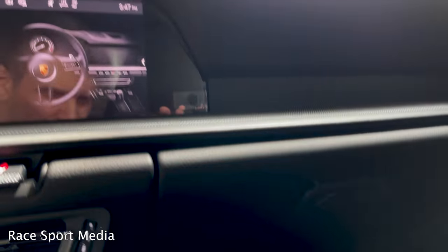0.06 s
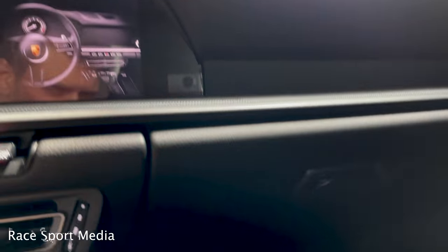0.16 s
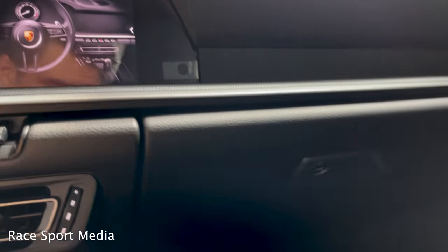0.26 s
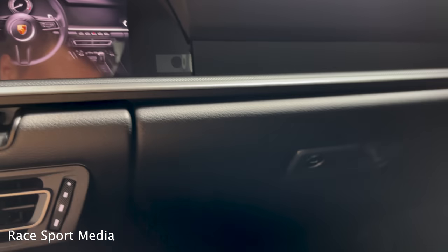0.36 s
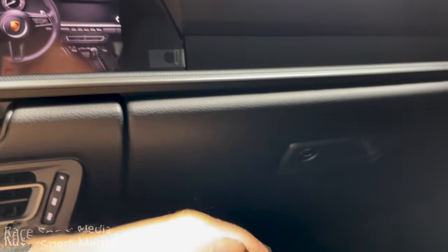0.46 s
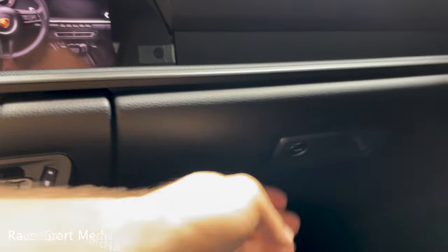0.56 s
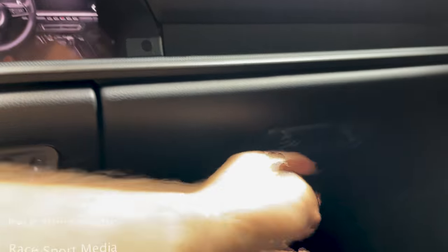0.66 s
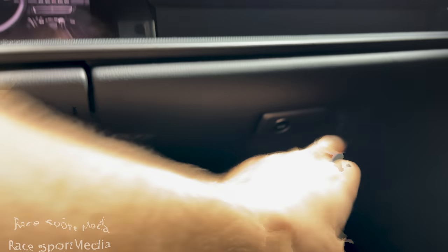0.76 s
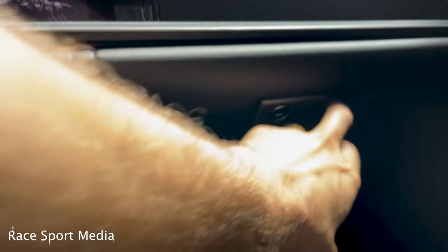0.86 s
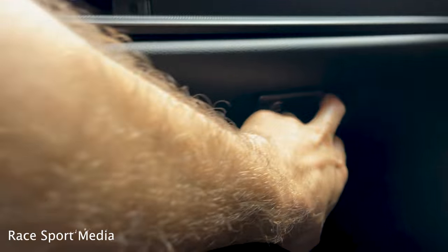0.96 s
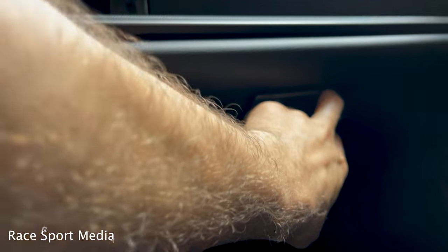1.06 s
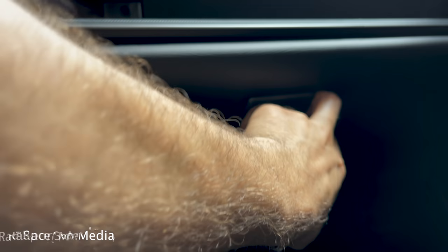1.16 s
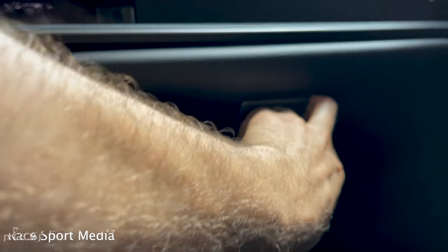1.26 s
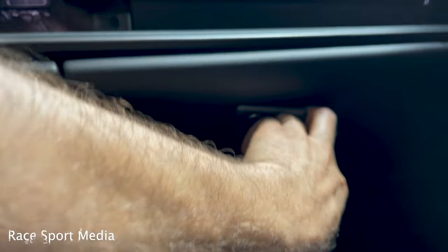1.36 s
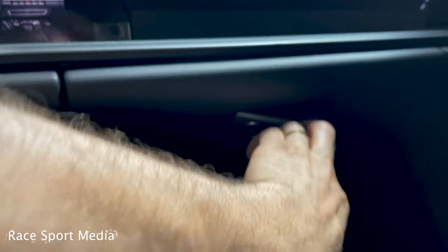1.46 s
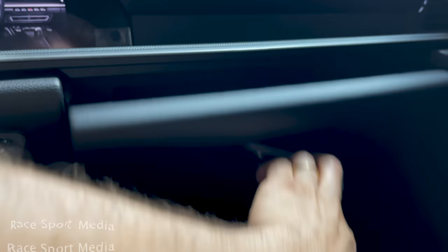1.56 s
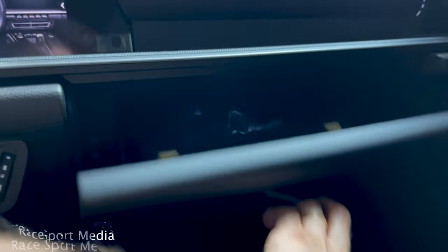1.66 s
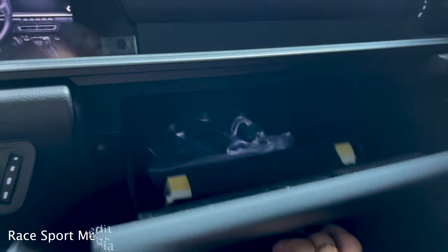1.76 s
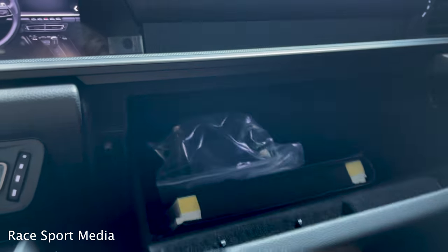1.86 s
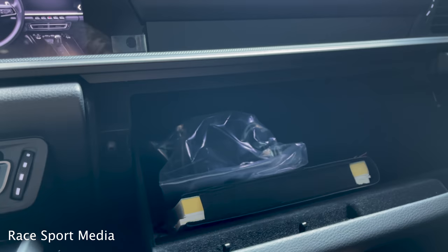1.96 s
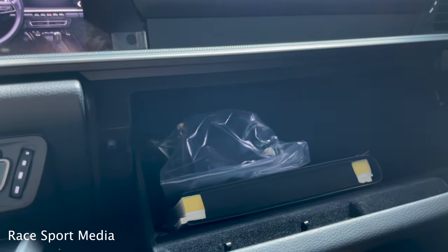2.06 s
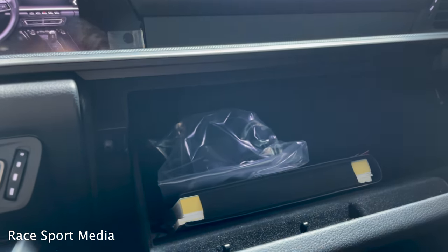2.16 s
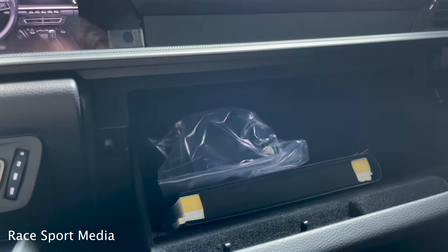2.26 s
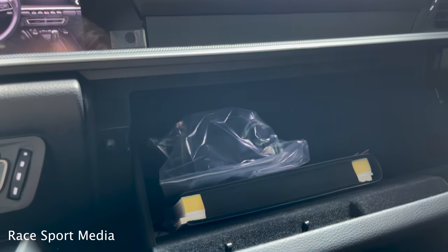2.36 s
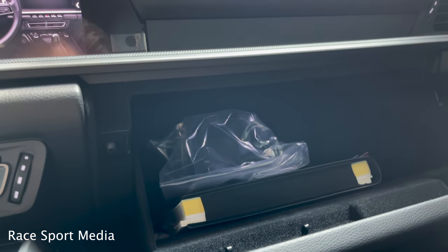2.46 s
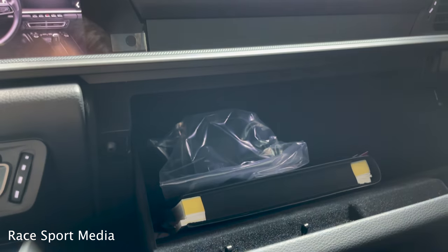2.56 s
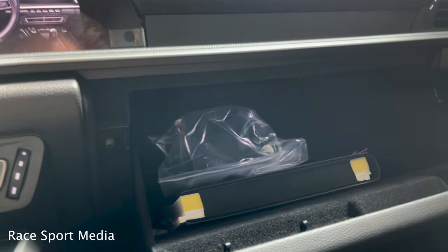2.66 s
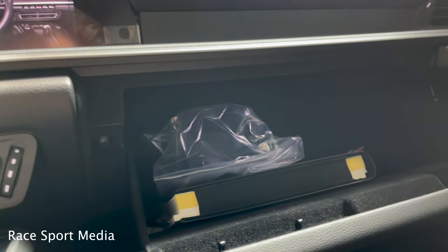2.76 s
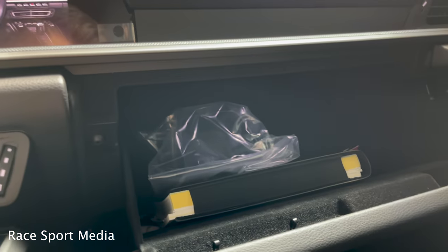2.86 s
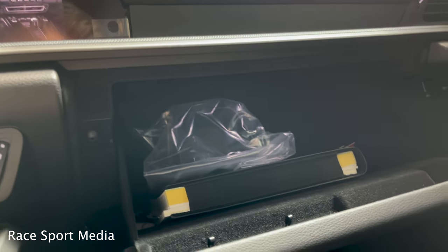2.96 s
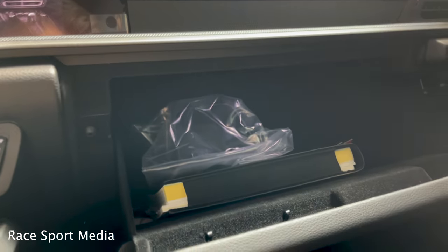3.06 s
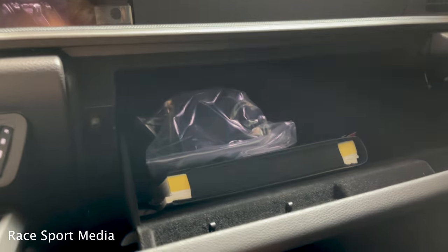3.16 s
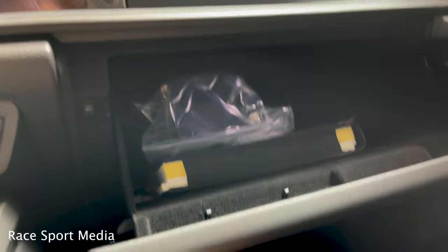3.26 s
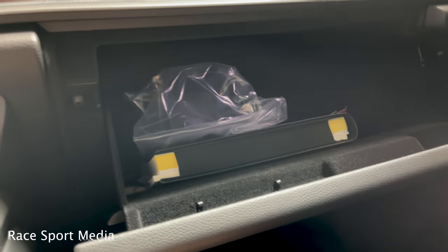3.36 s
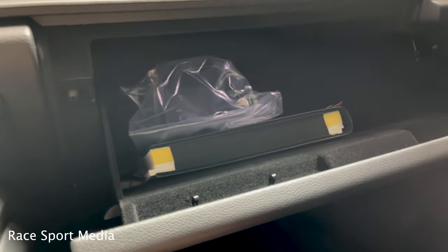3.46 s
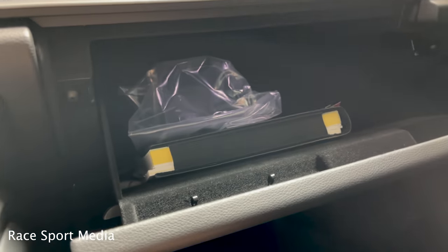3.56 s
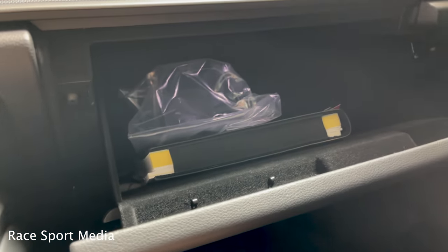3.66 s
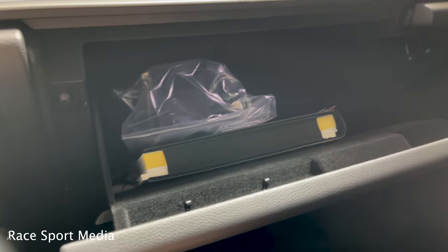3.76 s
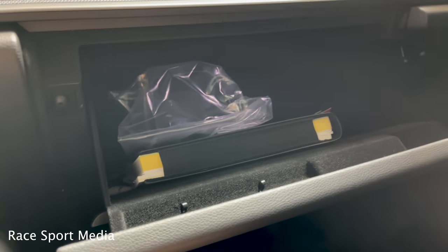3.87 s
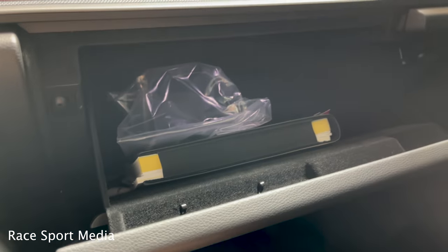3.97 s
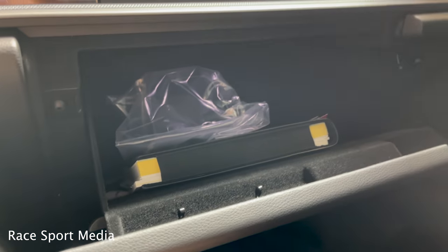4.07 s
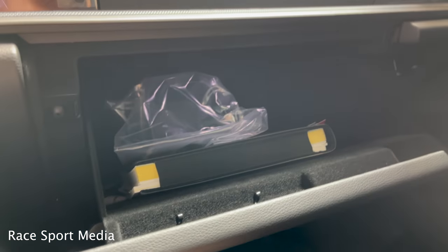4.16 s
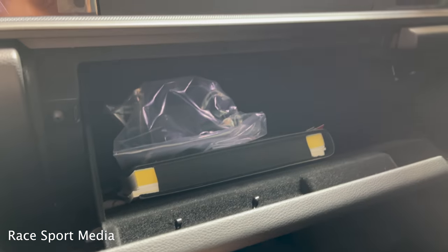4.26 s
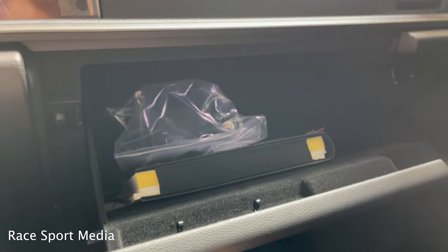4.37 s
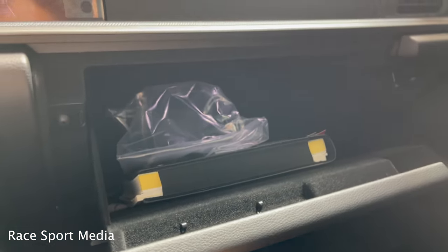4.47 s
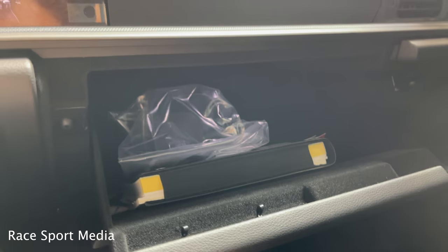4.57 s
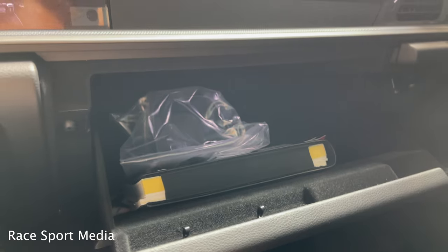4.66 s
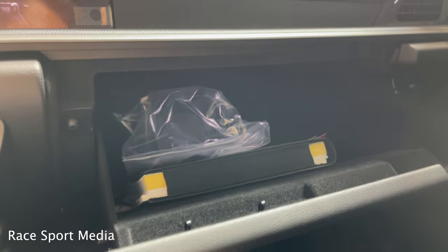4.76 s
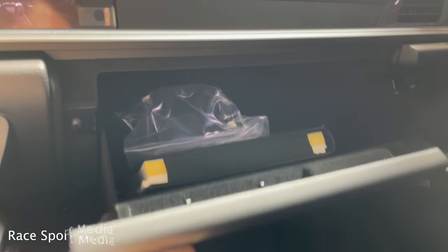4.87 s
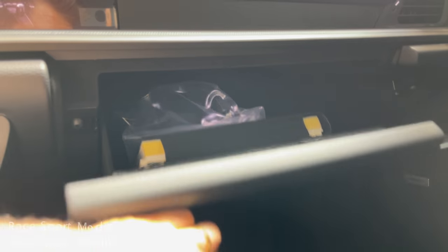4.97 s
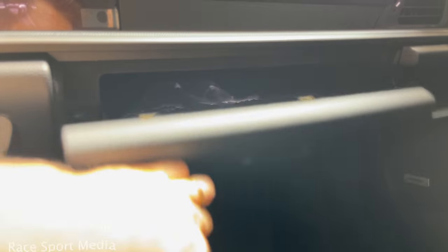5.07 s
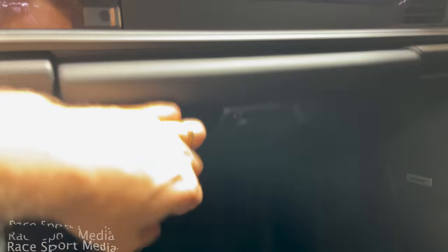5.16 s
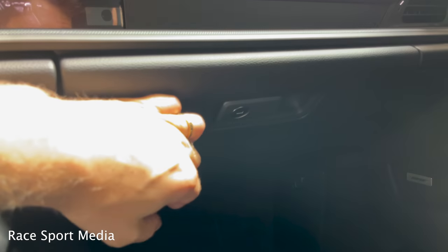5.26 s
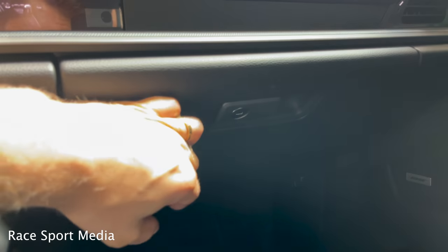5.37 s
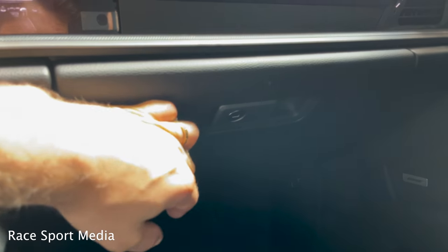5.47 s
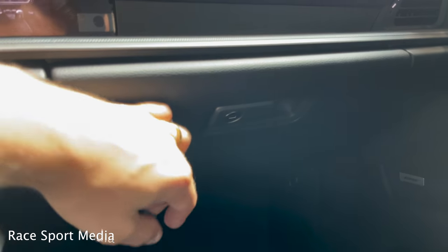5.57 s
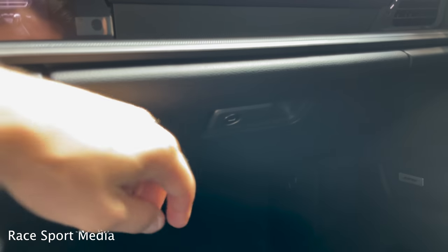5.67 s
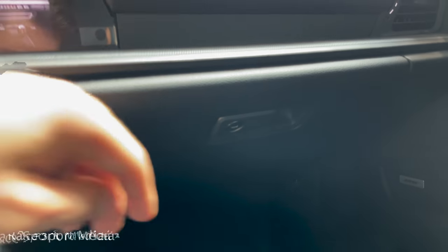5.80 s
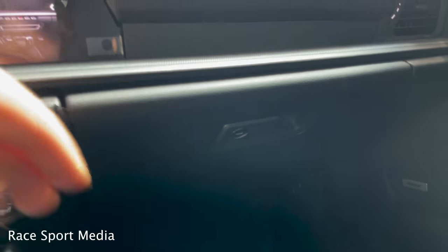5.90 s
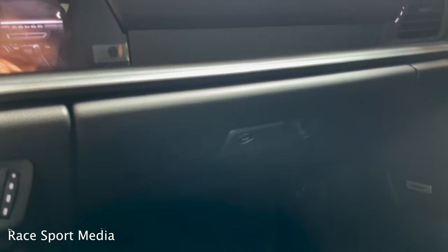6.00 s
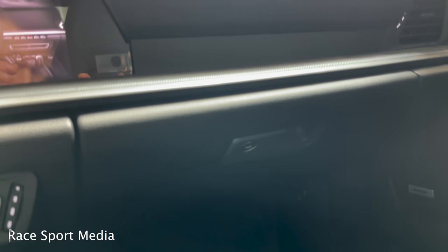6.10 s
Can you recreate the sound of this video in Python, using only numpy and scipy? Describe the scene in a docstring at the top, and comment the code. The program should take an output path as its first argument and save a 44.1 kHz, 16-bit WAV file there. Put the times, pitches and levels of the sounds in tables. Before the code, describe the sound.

Inside a quiet parked car, fingers knock and click a plastic glovebox latch, the door drops with a thud, then slams shut in a booming double thump.

```python
"""In a parked car: fingers tap and pull the latch of a plastic glovebox door, it slides down and lands on its stop,
things inside settle; later it is pushed up and slams in two blows that set the dashboard booming.
Knocks are bursts of noise ringing the door's modes; thumps are low decaying sines under them.
Scraping guides, faint broad swells of the background, skin and sleeve are showers of tiny coloured grains.
Dull outside noise seeping through the closed cabin is steady filtered noise that wavers slightly."""
import sys
import numpy as np
from scipy import signal
from scipy.fft import rfft, irfft, next_fast_len
from scipy.io import wavfile

SR = 44100
rng = np.random.default_rng(int(sys.argv[2]) if len(sys.argv) > 2 else 0)


def generate_wav(sig):
    """Save sig (samples, or channels by samples) to the path in sys.argv[1] as 16-bit PCM at SR."""
    pcm = np.round(np.clip(np.atleast_2d(sig).T, -1, 1) * 32767).astype(np.int16)
    wavfile.write(sys.argv[1], SR, pcm)


N = 270553

# outside noise and hiss, relative spectrum: freq_hz, density_db (per Hz)
CABIN_SPECTRUM = [(12, -51), (20, -30), (32, -19), (45, -12.5), (65, -2), (100, -2.5), (155, -9.5),
                  (220, -18), (520, -22.5), (700, -28.5), (1200, -33.5), (2400, -42.5), (3300, -50),
                  (6000, -55.5), (16000, -61.5)]
CABIN_RMS_DB = -48.5

# skin and sleeve, relative spectrum: freq_hz, density_db (per Hz)
RUSTLE_SPECTRUM = [(700, -26), (1200, -10.5), (1900, -0.5), (2800, -4.5), (4200, -11), (7000, -13),
                   (16000, -12.5)]
# skin and sleeve strokes: loudest_s, level_db, rise_s, fall_s
RUSTLE_STROKES = [(.03, -74, .1, .5), (.336, -73.5, 0.14, .06), (.75, -70, .9, 0.036), (1.02, -71, .2, .02),
                  (1.1, -57.5, 0.038, 0.14), (1.276, -66, 0.093, .15), (1.832, -67, 0.32, .04),
                  (1.89, -62, .02, 0.11), (1.955, -60.5, 0.12, 0.057), (2.46, -67, 0.13, 0.038),
                  (4.14, -72, .02, .03), (4.22, -68.5, 0.077, .15), (4.31, -63, 0.27, 0.086),
                  (4.94, -72, .2, .5), (5.125, -64, 0.091, 0.027), (5.62, -66.5, 0.089, 0.056)]
# dull scraping and swells, relative spectrum: freq_hz, density_db (per Hz)
DULL_SPECTRUM = [(100, 1.5), (200, 0), (600, -4), (1100, -8.5), (2000, -12), (2800, -26.5), (5000, -32.5),
                 (9000, -44), (16000, -42.5)]
# door scraping in its guides, and faint broad swells of the background:
# loudest_s, level_db (before DULL_LIFT_DB), rise_s, fall_s
DULL_STROKES = [(.77, -61.5, .5, 0.32), (1.02, -66, .5, 0.16), (1.34, -53.5, 0.14, 0.11),
                (1.52, -45, .13, 0.137), (1.64, -51, .2, .2), (1.81, -50.5, 0.11, 0.15),
                (1.92, -58, .2, 0.21), (2.2, -64.5, .08, 0.3), (2.7, -66.5, 1, .6),
                (4.29, -67.5, .25, 0.12), (4.81, -60, .02, 0.32), (5.135, -52.5, 0.55, .02),
                (5.45, -73.5, 0.51, 0.77)]
DULL_LIFT_DB = 5.5
STROKE_RANGE_DB = 20  # a stroke drops this far over its rise time before, or fall time after, its loudest
STROKE_ROUNDNESS = 1.15  # 1 = pointed top, 2 = rounded top

# light knocks of fingers, latch and hinge: start_s, level_db, pitch_hz, width_octaves, snap_db
LIGHT_KNOCKS = [(0.766, -51, 406, 2.2, -26), (0.886, -46, 860, 1.37, -33), (1.03, -47, 1730, 0.87, -22),
                (1.085, -51, 1570, 2.3, -22), (1.17, -57.5, 1410, 0.46, -10), (1.233, -57, 690, 0.53, -22),
                (1.253, -54, 800, 1.3, -21), (1.27, -61, 2460, 0.54, -16), (1.444, -49.5, 1490, 0.86, -25),
                (1.497, -44.5, 1180, 1.34, -30), (1.524, -43.5, 1470, 1.8, -11),
                (1.54, -40.5, 1600, 0.57, -17.5), (1.831, -50, 1750, 1.2, -29),
                (1.996, -42.5, 1130, 0.86, -28), (3.093, -73, 2000, 0.91, 0), (4.471, -43, 490, 0.49, -40),
                (4.484, -55, 305, 0.34, -15), (4.761, -61.5, 2370, 0.26, -7.5),
                (4.798, -42.5, 840, 0.71, -44), (5.254, -48.5, 1350, 0.67, -37.5),
                (5.385, -55.5, 1666, 1.13, -16)]
KNOCK_RATTLE_S, KNOCK_T60_S = 0.0065, 0.09

# heavy blows (latch lets go, door lands, two blows of the slam): start_s, level_db, pitch_hz, width_octaves,
# rattle_s, t60_s, snap_db, edge_hz, edge_db (re blow), hollow_hz, hollow_db (re blow), hollow_lag_s
HEAVY_BLOWS = [(1.508, -31.5, 1500, 0.54, 0.0054, 0.051, -59, 3300, -24, 300, -4.5, 0.00065),
               (2.0212, -24, 540, 1.5, 0.0029, 0.087, -27, 2600, -12.5, 358, -5, 0.00406),
               (5.141, -13.5, 720, 0.78, .009, 0.14, -38, 1670, -3, 383, -9, .005),
               (5.197, -16.5, 1450, 1.02, .011, 0.075, -25, 3060, -12.5, 400, -4, .012)]
EDGE_OCTAVES, EDGE_SNAP_DB = 0.89, -19.5  # a harder edge strikes with each blow
HOLLOW_OCTAVES, HOLLOW_RATTLE_S, HOLLOW_T60_S = 0.75, 0.018, 0.095  # then the box answers

# hinge stay clicks just before the door lands: start_s, level_db
HINGE_CLICKS = [(1.994, -49.5), (2.014, -47)]
STAY_HZ, STAY_OCTAVES, STAY_SNAP_DB = 5020, 0.23, -8
STAY_RATTLE_S, STAY_T60_S = 0.0035, 0.055

# things inside settle: start_s, level_db, snap_db
SETTLING_KNOCKS = [(2.202, -53, -9.5), (2.247, -49.5, -13.5), (2.312, -59, -6.5), (2.384, -64, -8.5)]
SETTLE_HZ, SETTLE_OCTAVES, SETTLE_RATTLE_S, SETTLE_T60_S = 1460, 1.11, 0.012, 0.093

# resonances of the door: mode_hz, level_db (relative, varied at each contact), t60_s
DOOR_MODES = [(301, 0, 0.11), (374.4, -4.5, 0.1), (552, 8, 0.034), (663, 5.5, 0.035), (741, 8.5, 0.045),
              (927, -4, 0.06), (1032, -8.5, 0.076), (1198, 2, 0.027), (1446, 0.5, 0.025), (1696, -2, 0.069),
              (1825, 1, 0.0408), (2101, 3.5, .04), (2560, -17.5, .03), (2740, -6, .025), (3400, -16, 0.013),
              (4700, -10.5, 0.0075), (5340, -14, 0.01)]
BROAD_DB = 39  # the dense unresolved modes, on the same relative scale
FADE_TILT = 0.41  # higher bands die sooner: t60 goes as Hz to the minus this
FIRST_TOUCH_DB = 21.5  # the first contact is one clean blow above the rattle
# brittle part of a contact: freq_hz, gain_db
SNAP_SPECTRUM = [(2000, -24.5), (4000, -8), (7000, 6.5), (16000, 2)]

# low thumps of door and dashboard panels: start_s, level_db, pitch_hz, push_s, t60_s
PANEL_THUMPS = [(0.77, -24, 93.3, 0.029, 0.11), (0.772, -39.5, 294, 0.0054, 0.081),
                (0.885, -32.5, 122, 0.012, 0.08), (0.907, -30.5, 66, 0.014, 0.45),
                (1.451, -29.5, 95, 0.0043, 0.11), (1.505, -34, 71, 0.023, 0.21),
                (1.511, -31, 145, 0.0065, 0.11), (1.619, -34, 63, 0.017, 0.23),
                (1.896, -31.5, 94, 0.0087, 0.14), (2.021, -22, 128, 0.0025, 0.042),
                (2.251, -36, 125.5, 0.01, 0.11), (4.484, -34.5, 107, 0.0069, 0.073),
                (5.145, -15.5, 167, 0.015, 0.081), (5.156, -16, 86, 0.022, 0.32),
                (5.2083, -2.5, 98, 0.0051, 0.043), (5.239, -13.5, 64.8, 0.013, 0.38),
                (5.241, -20.5, 78.9, 0.017, 0.18), (5.368, -27.5, 55.4, 0.011, 0.28)]

# microphone bass cut and port resonances: freq_hz, gain_db
MICROPHONE_RESPONSE = [(15, -16), (45, 0.5), (5500, 0.5), (7500, -1.5), (9700, 3.5), (12000, -6),
                       (14500, -0.5), (16000, -1.5)]
OVERLOAD_LEVEL = 0.8
STOPBAND_HZ = 16200


def from_db(db):
    """Decibels to amplitude."""
    return 10 ** (np.asarray(db) / 20)


def rms_one(x):
    """Scale to an rms of 1."""
    return x / np.sqrt(np.mean(x ** 2) + 1e-20)


def at_hz(points, hz):
    """A spectrum read on a log-frequency axis."""
    freq_hz, db = np.array(points).T
    return np.interp(np.log(np.maximum(hz, 1)), np.log(freq_hz), db)


def drift(rate_hz):
    """Slow random wander of rms 1: noise through a two-pole lowpass, run at 1/40 of the sample rate."""
    pole = np.exp(-2 * np.pi * rate_hz * 40 / SR)
    white = rng.standard_normal(N // 40 + 2002)
    slow = signal.lfilter([1], [1, -2 * pole, pole * pole], white)[2000:]  # drop the filter's start-up
    return np.interp(np.arange(N) / 40, np.arange(len(slow)), rms_one(slow))


def coloured(white, spectrum):
    """Noise given a spectrum; rms 1."""
    size = next_fast_len(N)
    gain = from_db(at_hz(spectrum, np.fft.rfftfreq(size, 1 / SR)))
    return rms_one(irfft(rfft(white, size) * gain, size)[:N])


def causal(gain):
    """The minimum-phase response of a magnitude: nothing sounds before the blow."""
    cepstrum = irfft(np.log(gain + 1e-9))
    half = len(cepstrum) // 2
    cepstrum[1:half] *= 2
    cepstrum[half + 1:] = 0
    return np.exp(rfft(cepstrum))


def cabin():
    """Steady muffled noise that wavers a little."""
    level = from_db(CABIN_RMS_DB + 0.7 * drift(2.1))
    return level * coloured(rng.standard_normal(N), CABIN_SPECTRUM)


def grains(per_s, spread_db):
    """Random grains of uneven size and either sign."""
    sizes = from_db(spread_db * np.minimum(rng.exponential(1, N), 5))
    signs = rng.choice([-1, 1], N)
    return sizes * signs * (rng.random(N) < per_s / SR)


def strokes(rows):
    """Gain over time: each stroke swells to its loudest moment and fades; the loudest stroke wins."""
    t = np.arange(N) / SR
    gains = []
    for loudest, db, rise, fall in rows:
        distance = np.maximum((loudest - t) / rise, (t - loudest) / fall)
        gains.append(from_db(db - STROKE_RANGE_DB * distance ** STROKE_ROUNDNESS))
    return np.max(gains, axis=0)


def rubbing_and_swells():
    """Grains, dull for door guides and background swells, bright for skin and cloth; both judder."""
    dull_judder, rustle_judder = from_db(2.2 * np.array([drift(30), drift(40)]))
    dull_gain = from_db(DULL_LIFT_DB) * strokes(DULL_STROKES)
    dull = dull_gain * coloured(grains(6000, spread_db=2.5), DULL_SPECTRUM)
    rustle = strokes(RUSTLE_STROKES) * coloured(grains(12000, spread_db=1.0), RUSTLE_SPECTRUM)
    return dull_judder * dull + rustle_judder * rustle


def contacts():
    """Every contact as start_s, level_db, pitch_hz, width_octaves, rattle_s, t60_s, snap_db."""
    rows = [(s, db, hz, octaves, KNOCK_RATTLE_S, KNOCK_T60_S, snap_db)
            for s, db, hz, octaves, snap_db in LIGHT_KNOCKS]
    rows += [(s, db, STAY_HZ, STAY_OCTAVES, STAY_RATTLE_S, STAY_T60_S, STAY_SNAP_DB)
             for s, db in HINGE_CLICKS]
    rows += [(s, db, SETTLE_HZ, SETTLE_OCTAVES, SETTLE_RATTLE_S, SETTLE_T60_S, snap_db)
             for s, db, snap_db in SETTLING_KNOCKS]
    for (s, db, hz, octaves, rattle, t60, snap_db,
         edge_hz, edge_db, hollow_hz, hollow_db, lag) in HEAVY_BLOWS:
        blow = (s, db, hz, octaves, rattle, t60, snap_db)
        edge = (s, db + edge_db, edge_hz, EDGE_OCTAVES, rattle, t60, EDGE_SNAP_DB)
        hollow = (s + lag, db + hollow_db, hollow_hz, HOLLOW_OCTAVES,
                  HOLLOW_RATTLE_S, HOLLOW_T60_S, -np.inf)  # the box has no snap
        rows += [blow, edge, hollow]
    return rows


def dying(noise, t, rattle, t60):
    """Noise that rises in 0.4 ms, holds while the parts rattle and then dies."""
    attack = np.minimum(t / 0.0004, 1)
    return noise * attack * from_db(-60 * np.maximum(t - rattle, 0) / t60)


def knocks():
    """Each knock is a short rattle that rings the door's modes, over dense noise whose higher bands die sooner."""
    size = 16384
    out = np.zeros(N + size)
    t, hz = np.arange(size) / SR, np.fft.rfftfreq(size, 1 / SR)
    audible_hz = np.maximum(hz, 20)
    rows = contacts()
    noises = rng.standard_normal((len(rows), 2, size))
    strengths_db = rng.normal(0, 2, (len(rows), len(DOOR_MODES)))  # each contact excites the modes unevenly
    rings = np.array([rfft(from_db(db - 60 * t / t60) * np.sin(2 * np.pi * mode_hz * t))
                      for mode_hz, db, t60 in DOOR_MODES])
    centres_hz = 250 * 4.0 ** np.arange(4)
    bands = [causal(1 / (1 + (np.log2(audible_hz / c) / 1.1) ** 4)) for c in centres_hz]
    snap = causal(from_db(at_hz(SNAP_SPECTRUM, hz)))
    head = int(0.012 * SR)  # the body's level is set over its first 12 ms
    for row, (body_noise, snap_noise), strength_db in zip(rows, noises, strengths_db):
        s, db, pitch_hz, octaves, rattle, t60, snap_db = row
        struck = body_noise * (t < rattle)  # the modes are driven only while the parts touch
        struck[0] = from_db(FIRST_TOUCH_DB)
        modes = from_db(strength_db) @ rings * rfft(struck)
        dense = 0
        for c, band in zip(centres_hz, bands):
            band_t60 = t60 * (c / 1000) ** -FADE_TILT
            dense = dense + band * rfft(dying(body_noise, t, rattle, band_t60))
        contact = causal(1 / (1 + np.abs(np.log2(audible_hz / pitch_hz) / octaves) ** 3.16))
        body = irfft((modes + from_db(BROAD_DB) * dense) * contact)
        bright = irfft(rfft(dying(snap_noise, t, rattle, 0.7 * t60)) * snap)
        knock = from_db(db) * (body / np.std(body[:head]) + from_db(snap_db) * bright)
        at = round(s * SR)
        out[at:at + size // 2] += knock[:size // 2]
    return out[:N]


def thumps():
    """A panel swells while it is pushed, then rings down."""
    out, t = np.zeros(N + SR), np.arange(SR) / SR
    for s, db, hz, push, t60 in PANEL_THUMPS:
        swell = np.sin(np.pi / 2 * np.minimum(t / push, 1))
        decay = from_db(db - 60 * np.maximum(t - push, 0) / t60)
        at = round(s * SR)
        out[at:at + SR] += decay * swell * np.sin(2 * np.pi * hz * t)
    return out[:N]


def scene():
    """Cabin noise, rubbing and swells, knocks and thumps summed to one channel."""
    return (cabin() + rubbing_and_swells() + knocks() + thumps())[None]


def record(dry):
    """The microphone cuts the bass and colours the treble, peaks are rounded, the top is cut."""
    size = next_fast_len(N + SR, real=True) * 2
    response = causal(from_db(at_hz(MICROPHONE_RESPONSE, np.fft.rfftfreq(size, 1 / SR))))
    heard = irfft(rfft(dry, size) * response, size)[:, :N]
    rounded = OVERLOAD_LEVEL * np.tanh(heard / OVERLOAD_LEVEL)
    top_cut = signal.cheby2(20, 70, STOPBAND_HZ, fs=SR, output="sos")
    return signal.sosfilt(top_cut, rounded)


dry = scene()
out = record(dry)
generate_wav(out)
```